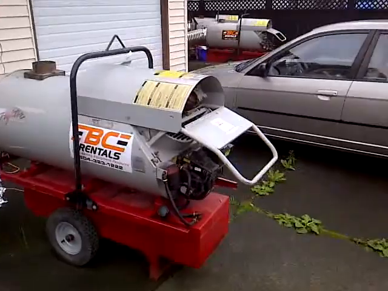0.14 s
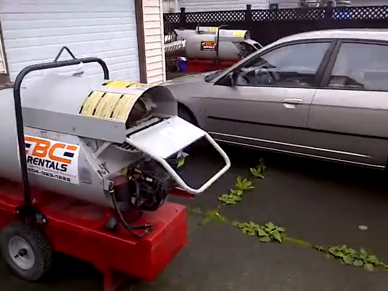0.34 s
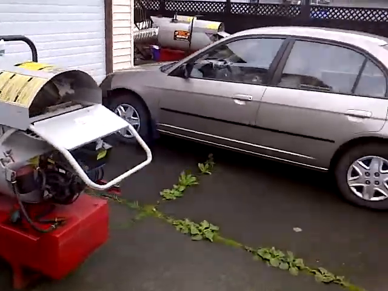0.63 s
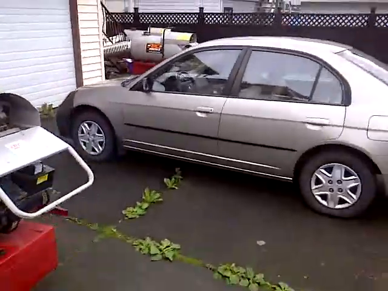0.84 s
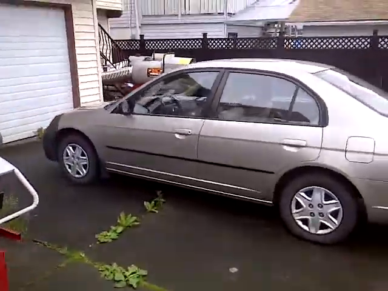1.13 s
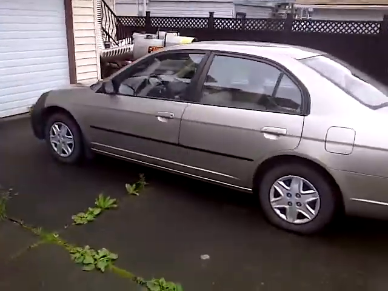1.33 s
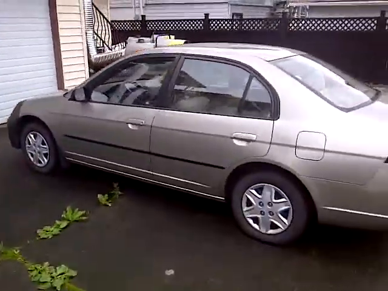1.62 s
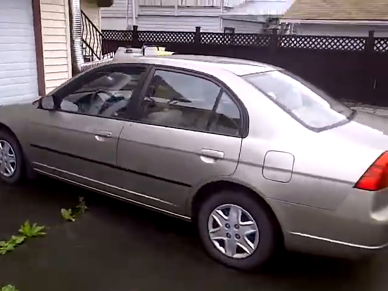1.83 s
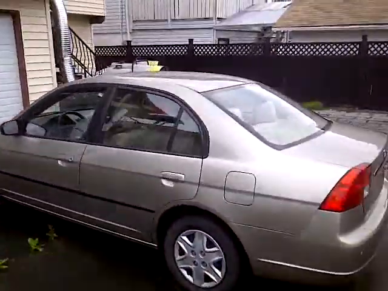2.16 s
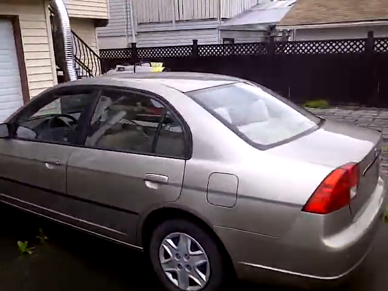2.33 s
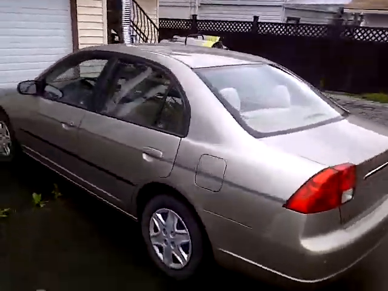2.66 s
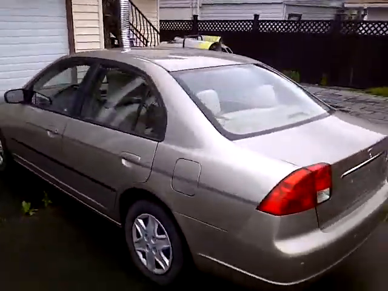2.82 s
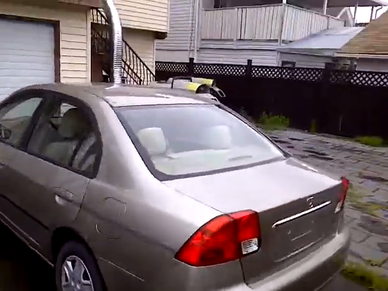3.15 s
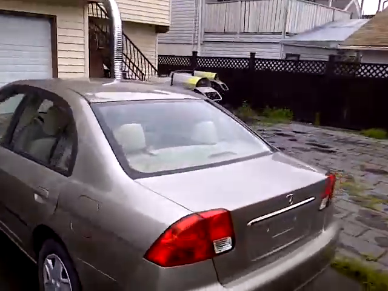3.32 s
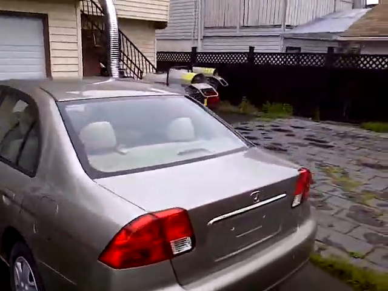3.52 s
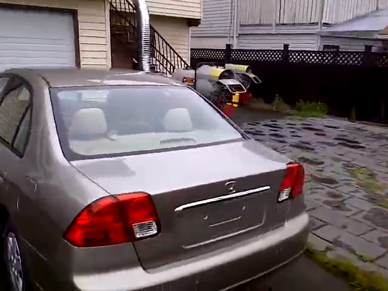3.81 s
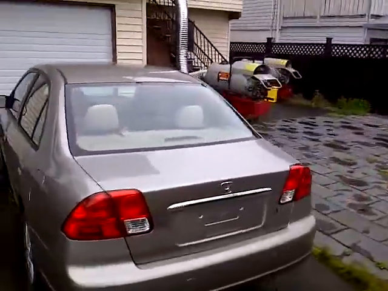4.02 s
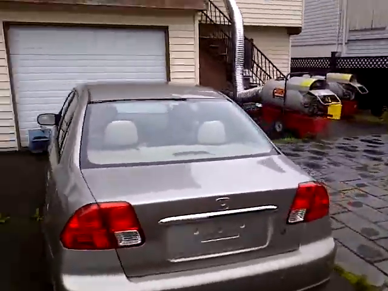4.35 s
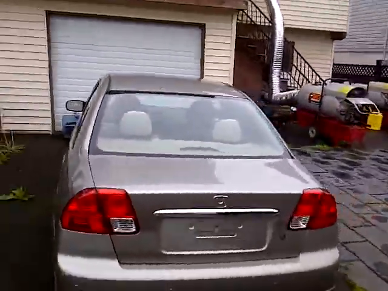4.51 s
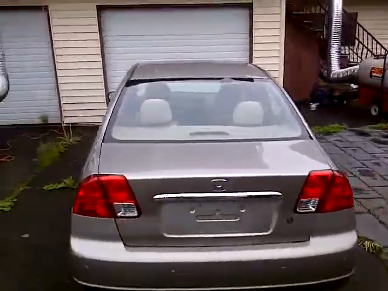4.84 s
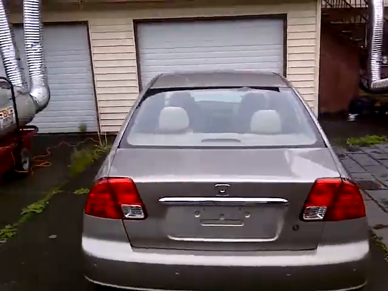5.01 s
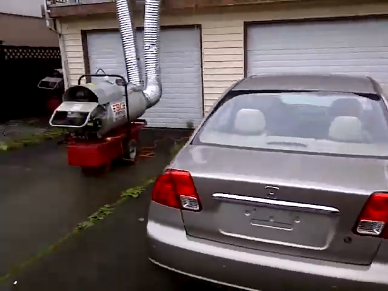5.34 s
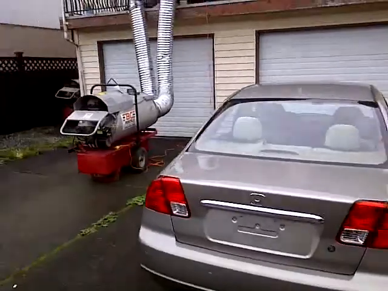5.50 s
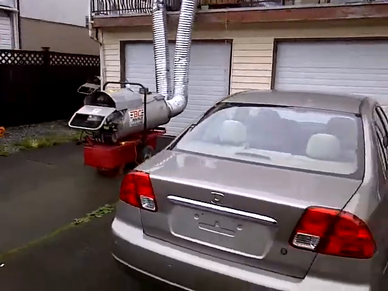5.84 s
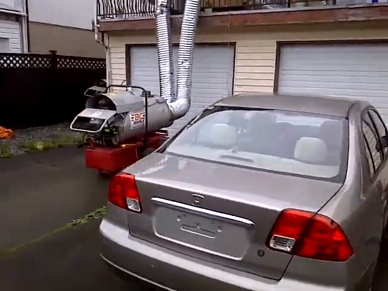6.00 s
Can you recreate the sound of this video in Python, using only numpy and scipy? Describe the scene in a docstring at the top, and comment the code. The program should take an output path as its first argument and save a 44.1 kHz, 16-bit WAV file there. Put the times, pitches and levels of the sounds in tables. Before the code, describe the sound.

Outdoors, close to several running heaters: an unbroken roar of burners in steel drums, broad blower wind and a wavering low hum, with quiet hiss and faint whistles on top. Already at full strength at the start, it softens a little as the microphone is carried round a car. Echoes from walls move its tone, the hum comes and goes, and the balance changes near five seconds as another heater comes clear.

```python
"""Oil-fired forced-air heaters run in a paved yard between house walls; the listener walks slowly away round a car.
From the start flames roar in steel drums, fans rush air into booming ducts, blades hum and nozzles hiss and whistle:
filtered noise and wavering sines, with a faint breeze at the microphone. Echoes keep shifting the colour.
A motor hum swells briefly near 1.85 s, faint ticks fall at 3.2 and 4.0 s, and near 5.1 s another heater
comes clear of the car, rebalancing the layers."""
import sys
import numpy as np
from scipy import signal
from scipy.fft import rfft, irfft, next_fast_len
from scipy.io import wavfile

SR = 44100
rng = np.random.default_rng(int(sys.argv[2]) if len(sys.argv) > 2 else 0)


def transcribe(signal):
    """Save signal, clipped to [-1, 1], as a 16-bit WAV file at the path in sys.argv[1]."""
    frames = np.atleast_2d(signal).T
    limited = np.clip(frames, -1, 1)
    pcm = np.round(limited * 32767).astype(np.int16)
    wavfile.write(sys.argv[1], SR, pcm)


N = 272097   # length in samples

# The walk: start_s, distance_m, flank_share (0 burner end, 1 flank), drum_hz, drum_lift_db,
# rush_band_hz, intake_band_hz
WALK = [(0, 3.16, 0, 365, -0.5, 1140, 2036), (.8, 3.42, 0.5, 360, 7, 1137, 2060),
        (1.05, 3.7, 0.66, 367, 5, 897, 2490), (1.3, 3.57, 0.7, 372, 4.5, 705, 2770),
        (1.65, 3.72, 0.73, 380, 6.5, 664, 2870), (2, 3.58, 0.8, 351, -2.5, 637, 2920),
        (2.6, 3.84, 0.48, 398, 2.5, 713, 2500), (3.3, 4.1, 0.63, 415, 4, 836, 2750),
        (4.1, 4.46, 0.9, 432, 1.5, 917, 2560), (4.8, 4.44, 0.35, 448, 2.5, 593, 2250),
        (5.5, 4.72, 0.37, 394, 0.5, 604, 2120), (6.17, 4.75, 0.5, 352, -3.5, 594, 2240)]
# Standing waves between the walls, crossed on the walk: start_s, blade_hum_db, duct_boom_db
STANDING_WAVES = [(0.0, -42, -50), (0.55, -46.5, -43.5), (0.7, -54, -45.5), (0.88, -46.5, -46.5),
                  (1.3, -48.5, -45), (1.5, -56, -41), (1.63, -42, -49), (1.8, -38.5, -45.5),
                  (1.95, -36.5, -45), (2.13, -48, -43), (2.3, -42, -45.5), (2.45, -50, -46),
                  (2.6, -46, -46), (2.85, -54, -43), (3.2, -40, -48), (3.38, -41, -45), (3.6, -37, -48),
                  (3.78, -44, -46), (3.95, -36.5, -50), (4.08, -53, -52), (4.18, -44.5, -55),
                  (4.32, -36, -47), (4.7, -37.5, -46), (5.0, -38, -50.5), (5.24, -36.5, -54),
                  (5.5, -32.5, -52), (5.8, -40.5, -44), (6.17, -46.5, -50)]
# Bands swelling or dipping as echoes off walls and car add or cancel:
# width_hz, then a path of (start_s, centre_hz, gain_db)
SHIFTING_BANDS = [ (70.0, [(0, 290, 3), (.6, 290, 1), (1.6, 300, 0.5), (2.2, 237, -0.5), (2.8, 230, -5.5),
                  (3.4, 225, -3), (4.3, 337, -3.5), (5.0, 303, 0), (5.7, 290, 2.5), (6.17, 290, 2)]),
                  (79.6, [(0, 470, 2.5), (.7, 470, -2), (1.5, 423, 0), (2.1, 467, -1), (2.9, 510, -1),
                  (3.4, 542, -1.5), (3.8, 554, -0.5), (4.4, 510, -2.5), (5.2, 473, 4), (6.17, 503, -0.5)]),
                  (130.0, [(0, 716, -4.5), (.6, 692, 2), (1.4, 744, -2), (2.4, 740, 2), (3.2, 746, 0),
                  (4.2, 704, -2.5), (4.9, 706, -3.5), (5.5, 680, -2.5), (6.17, 720, 1)]),
                  (90.0, [(0, 950, 3), (.9, 980, 0), (1.8, 940, 2.5), (2.7, 900, 1), (3.4, 850, 3),
                  (4.0, 975, -1), (5.0, 900, 3), (5.6, 870, -2.5), (6.17, 826, 3)]),
                  (220.0, [(0, 1200, 1.5), (.6, 1290, 0), (1.4, 1390, 2.5), (2.0, 1340, 1.5),
                  (3.0, 1450, 0), (4.0, 1450, 2), (4.7, 1480, 0.5), (5.4, 1430, 3.5), (5.8, 1500, 3),
                  (6.17, 1450, 1)]), (250.0, [(0, 2050, 2.5), (.5, 2280, -2.5), (.9, 2250, -0.5),
                  (1.3, 2100, 0), (2.2, 2180, -2), (2.9, 2200, -1), (3.4, 2180, 3), (4.0, 2220, -4),
                  (4.6, 2200, -2.5), (5.2, 2200, -2), (6.17, 2300, 1.5)]), (220.0, [(0, 1550, -2),
                  (.8, 1700, -0.5), (2.0, 1750, 0), (3.0, 1770, -1), (3.9, 1670, -6), (4.6, 1730, -5),
                  (5.3, 1740, -4), (6.17, 1760, 0)]), (400.0, [(0, 2800, 0.5), (.7, 2800, 3.5),
                  (1.2, 2850, 3.5), (1.7, 3020, 1.5), (2.3, 2900, 0.5), (3.1, 2790, 2), (4.0, 2900, 1),
                  (4.6, 2750, 2.5), (6.17, 2810, 0.5)]), (300.0, [(0, 3500, -1.5), (1.1, 3600, 0.5),
                  (1.6, 3500, -0.5), (2.1, 3370, 1), (2.6, 3780, 5), (3.0, 3500, -1), (3.4, 3420, 0),
                  (4.5, 3560, -2.5), (6.17, 3450, -2)])]

# Noise spectra of the sources: pitch_hz, level_db (per Hz, before levelling to rms 1)
GROWL_SPECTRUM = [(91, -29), (155, -6), (215, -0.5), (285, 2), (370, -25.5), (630, -120)]   # flame, low part
ROAR_SPECTRUM = [(160, -43), (280, -3.5), (420, -2.5), (560, -8.5), (730, -18.5), (1230, -120)]   # flame in the drum
RUSH_SPECTRUM = [(310, -24.5), (520, -3), (953, -8), (1060, -11), (1300, -15.5), (1690, -42.5),
                 (2860, -120)]   # fan air, lower band
UPPER_RUSH_SPECTRUM = [(710, -42), (1200, -4.5), (1430, -2), (1560, -5.5), (1700, -8.5), (1900, -16.5),
                       (2470, -38), (4180, -120)]   # fan air, upper band
INTAKE_SPECTRUM = [(1060, -39), (1800, 3), (2240, -2.5), (2620, -5), (3600, -11), (4680, -48), (7920, -120)]   # air drawn through the fan guard
HISS_SPECTRUM = [(2000, -35.5), (3400, -4.5), (3920, -3), (4390, -3.5), (5220, -7), (6520, -6), (7450, -14),
                 (8490, -30.5), (11000, -58.5), (18700, -120)]   # burner nozzles
BOOM_SPECTRUM = [(70, -43.5), (85, -18), (98, -4), (115, 4), (126, -7), (134, -7.5), (150, -12.5),
                 (175, -38)]   # air booming in the long ducts
BREEZE_SPECTRUM = [(8.8, -52), (15, -20), (32, -12.5), (59, -6), (75, -10.5), (88, 4), (110, -29.5),
                   (190, -120)]   # moving air at the microphone

# Source levels at the reference distance: burner_end_db, flank_change_db, clear_of_car_gain_db
GROWL_LEVEL = (-32, -2, 0)
ROAR_LEVEL = (-26, 0, -1.2)
RUSH_LEVEL = (-29, 2.5, -2.6)
UPPER_RUSH_LEVEL = (-41, 2, 2)
INTAKE_LEVEL = (-49, 3.5, -1.7)
HISS_LEVEL = (-55.5, 2.5, 0.1)

# Whistles at the nozzles: pitch_hz, width_hz (of each of two filter passes), level_db (against the hiss)
WHISTLES = [(4280, 170, -12), (4540, 130, -16.5)]
# The whistles on the walk: start_s, strength_db, pitch_shift_hz
WHISTLE_PATH = [(0, -3.5, -170), (.55, -1, -170), (.7, -2, 0), (.9, 2, 20), (1.25, 1, 0), (1.45, -5, 0),
                (1.8, 3.5, 0), (2.1, -5.5, 0), (2.5, -1.5, 0), (3.0, -11, 0), (3.4, 1, 0), (3.9, -4.5, 0),
                (4.4, -0.5, 0), (5.0, -12.5, 0), (5.6, -5, 0), (5.9, 3.5, 0), (6.17, -3.5, -0.5)]
# Overtones of the blade hum: multiple, level_db (against the roar)
HUM_OVERTONES = [(2, -16), (3, -17), (4, -18)]
# Motor hum on the walk: start_s, level_db
MOTOR_PATH = [(0, -60), (.9, -53), (1.1, -48), (1.3, -56), (1.47, -46), (1.63, -53), (1.85, -38),
              (2.02, -54), (2.2, -49), (2.6, -60), (3.0, -55), (3.22, -48), (3.4, -60), (6.17, -60)]
# Faint ticks close by: start_s, peak_db (before dulling), pitch_hz
TICKS = [(3.2174, -36, 6100), (4.0214, -33, 5300), (4.0246, -38.5, 5000)]

BREEZE_DB = -55.5
NEAR_M = 3   # reference distance of the source levels
CLEAR_S, CLEAR_SPREAD_S = 5.08, 0.28   # another heater comes clear of the car
HEATER_M, EAR_M = 0.35, 1.5   # heights above the paving
PAVING_SHARE = 0.044   # echo strength against the direct sound
SOUND_M_PER_S = 343
BLADE_HZ, BLADE_WAVER_HZ = 145.1, 0.2526
MOTOR_HZ, MOTOR_WAVER_HZ = 117.5, 2.0
CUTOFF_HZ = 9250
DRIFT_STEP = 40   # samples between points of a slow drift
BLOCK = 512   # samples between moves of a resonance


def from_db(db):
    """Decibels to amplitude."""
    return 10 ** (np.asarray(db) / 20)


def rms_one(x):
    """Levels a signal to rms 1."""
    return x / np.sqrt(np.mean(x ** 2) + 1e-20)


def in_time(rows):
    """Draws straight lines between the rows of a path, one curve per column after start_s."""
    start_s, *columns = np.transpose(rows)
    time_s = np.arange(N) / SR
    return [np.interp(time_s, start_s, column) for column in columns]


def drift(rate_hz):
    """Slow random wander of rms 1: sparse noise through a double one-pole low-pass."""
    r = np.exp(-2 * np.pi * rate_hz * DRIFT_STEP / SR)
    noise = rng.standard_normal(N // DRIFT_STEP + 2002)
    slow = signal.lfilter([1], [1, -2 * r, r * r], noise)[2000:]   # drop the filter's start-up
    return np.interp(np.arange(N) / DRIFT_STEP, np.arange(len(slow)), rms_one(slow))


def coloured(spectrum, flicker_db, flicker_hz):
    """Turbulence noise of the given spectrum with a flickering level; rms 1."""
    size = next_fast_len(N)
    pitch_hz, level_db = np.transpose(spectrum)
    log_hz = np.log(np.maximum(np.arange(size // 2 + 1) * SR / size, 1))
    gain = from_db(np.interp(log_hz, np.log(pitch_hz), level_db, left=-120, right=-120))
    noise = irfft(rfft(rng.standard_normal(size)) * gain, size)[:N]
    return rms_one(noise * from_db(flicker_db * drift(flicker_hz)))


def resonance(x, centre_hz, width_hz):
    """Two-pole band-pass whose centre may move, stepped in short blocks."""
    out, state = np.empty(N), np.zeros(2)
    centre_hz = np.broadcast_to(centre_hz, N)
    r = np.exp(-np.pi * np.clip(width_hz, 5, 4000) / SR)
    b = (1 - r * r) / 2 * np.array([1, 0, -1])
    for i in range(0, N, BLOCK):
        a = [1, -2 * r * np.cos(2 * np.pi * centre_hz[i] / SR), r * r]
        out[i:i + BLOCK], state = signal.lfilter(b, a, x[i:i + BLOCK], zi=state)
    return out


def lifted(x, centre_hz, width_hz, lift_db):
    """Adds a resonant band on top of a broad noise; rms 1."""
    return rms_one(x + from_db(lift_db) * resonance(x, centre_hz, width_hz))


def heard_db(source, distance_m, flank):
    """Source level after spreading with distance, the turn to the flank and the heater clearing the car."""
    level_db, flank_db, clear_db = source
    clear = 1 / (1 + np.exp((CLEAR_S - np.arange(N) / SR) / CLEAR_SPREAD_S))
    spreading_db = -20 * np.log10(distance_m / NEAR_M)
    return level_db + flank_db * flank + clear_db * clear + spreading_db


def flame(growl_db, roar_db, drum_hz, lift_db):
    """Unsteady burning: a low growl, and the roar lifted around the drum's resonance."""
    growl = coloured(GROWL_SPECTRUM, flicker_db=0.4, flicker_hz=12.0)
    roar = coloured(ROAR_SPECTRUM, flicker_db=0.7, flicker_hz=34.0)
    roar = lifted(roar, drum_hz, width_hz=98.0, lift_db=lift_db)
    return from_db(growl_db) * growl + from_db(roar_db) * roar


def fan_rush(rush_db, upper_db, band_hz):
    """Turbulence from the blades in two broad bands, the lower one with a moving resonance."""
    body = coloured(RUSH_SPECTRUM, flicker_db=0.3, flicker_hz=6.2)
    body = lifted(body, band_hz, width_hz=210.0, lift_db=-11.5)
    upper = coloured(UPPER_RUSH_SPECTRUM, flicker_db=1.0, flicker_hz=12.0)
    return from_db(rush_db) * body + from_db(upper_db) * upper


def intake(band_hz):
    """Air drawn through the fan guard: broad noise with a resonant band that moves on the walk."""
    air = coloured(INTAKE_SPECTRUM, flicker_db=0.5, flicker_hz=7.9)
    return lifted(air, band_hz, width_hz=470.0, lift_db=-7.5)


def nozzles():
    """Spray hiss with faint wavering whistles, each a noise rung twice through a narrow resonance."""
    out = coloured(HISS_SPECTRUM, flicker_db=0.8, flicker_hz=12.0)
    strength_db, shift_hz = in_time(WHISTLE_PATH)
    for pitch_hz, width_hz, level_db in WHISTLES:
        centre_hz = pitch_hz + shift_hz
        tone = resonance(rng.standard_normal(N), centre_hz, width_hz)
        tone = resonance(tone, centre_hz, width_hz)
        waver_db = 2.5 * drift(6.0)
        out += from_db(level_db + strength_db + waver_db) * rms_one(tone)
    return rms_one(out)


def duct_boom(boom_db):
    """Low noise of air booming in the long ducts."""
    return from_db(boom_db) * coloured(BOOM_SPECTRUM, flicker_db=0.5, flicker_hz=5.7)


def blade_hum(hum_db, roar_db):
    """Wavering blade-passing tone, with overtones that fade with the roar."""
    phase = 2 * np.pi * np.cumsum(BLADE_HZ + BLADE_WAVER_HZ * drift(0.55)) / SR
    out = from_db(hum_db + 1.5 * drift(5.0)) * np.sin(phase)
    for multiple, level_db in HUM_OVERTONES:
        overtone = np.sin(multiple * phase + rng.uniform(0, 2 * np.pi))
        out += from_db(roar_db + level_db + 4.0 * drift(0.86)) * overtone
    return np.sqrt(2) * out   # a sine of peak root two has rms 1


def motor_hum():
    """Sine of wavering pitch below the blade tone, swelling and fading on the walk."""
    level_db, = in_time(MOTOR_PATH)
    phase = 2 * np.pi * np.cumsum(MOTOR_HZ + MOTOR_WAVER_HZ * drift(1.5)) / SR
    return np.sqrt(2) * from_db(level_db) * np.sin(phase)


def breeze():
    """Very low noise of moving air at the microphone."""
    return from_db(BREEZE_DB) * coloured(BREEZE_SPECTRUM, flicker_db=1.8, flicker_hz=1.5)


def ticks():
    """Each tick is a click through a broad resonance, applied twice, then dulled on top."""
    out = np.zeros(N)
    for start_s, peak_db, pitch_hz in TICKS:
        click = np.full(N, 1e-18)   # tiny floor keeps the filters quick
        click[round(start_s * SR)] = 1
        ring = resonance(click, pitch_hz, width_hz=3300.0)
        ring = resonance(ring, pitch_hz, width_hz=3300.0)
        out += from_db(peak_db) * ring / np.abs(ring).max()
    dulling = signal.butter(10, 7100, fs=SR, output="sos")
    return signal.sosfilt(dulling, out)


def paving(x, distance_m):
    """One faint echo off the ground; its lag shrinks as distance grows, so shallow notches glide upward."""
    direct_m = np.hypot(distance_m, EAR_M - HEATER_M)
    bounced_m = np.hypot(distance_m, EAR_M + HEATER_M)
    lag = (bounced_m - direct_m) / SOUND_M_PER_S * SR   # samples
    echo = np.interp(np.arange(N) - lag, np.arange(N), x)
    return (x + PAVING_SHARE * echo) / np.sqrt(1 + PAVING_SHARE ** 2)


def yard(x):
    """Echo colour of walls and car: each shifting band is lifted or cut around its moving centre."""
    for width_hz, path in SHIFTING_BANDS:
        centre_hz, gain_db = in_time(path)
        x = x + (from_db(gain_db) - 1) * resonance(x, centre_hz, width_hz)
    return x


def scene():
    """Rush, intake and hiss meet their echo off the paving; the lows arrive without it."""
    distance_m, flank, drum_hz, lift_db, rush_hz, intake_hz = in_time(WALK)
    hum_db, boom_db = in_time(STANDING_WAVES)
    roar_db = heard_db(ROAR_LEVEL, distance_m, flank)
    growl_db = heard_db(GROWL_LEVEL, distance_m, flank)
    rush_db = heard_db(RUSH_LEVEL, distance_m, flank)
    upper_db = heard_db(UPPER_RUSH_LEVEL, distance_m, flank)
    intake_db = heard_db(INTAKE_LEVEL, distance_m, flank)
    hiss_db = heard_db(HISS_LEVEL, distance_m, flank)

    lows = flame(growl_db, roar_db, drum_hz, lift_db) + duct_boom(boom_db)
    lows += blade_hum(hum_db, roar_db) + motor_hum()
    air = fan_rush(rush_db, upper_db, rush_hz)
    air += from_db(intake_db) * intake(intake_hz)
    air += from_db(hiss_db) * nozzles()

    surge = from_db(0.26 * drift(11.0))   # uneven burning shakes all the heater sound
    heaters = surge * yard(lows + paving(air, distance_m))
    return (heaters + breeze() + ticks())[None]


def record(dry):
    """Cuts the top steeply."""
    top_cut = signal.cheby2(16, 50, CUTOFF_HZ, fs=SR, output="sos")
    return signal.sosfilt(top_cut, dry)


dry = scene()
out = record(dry)
transcribe(out)
```